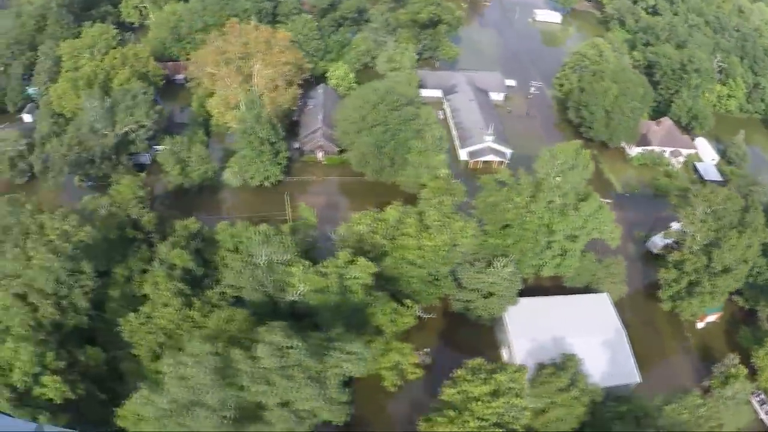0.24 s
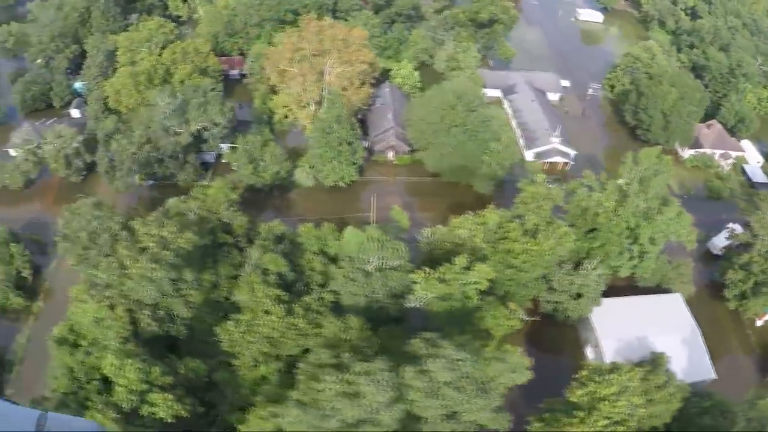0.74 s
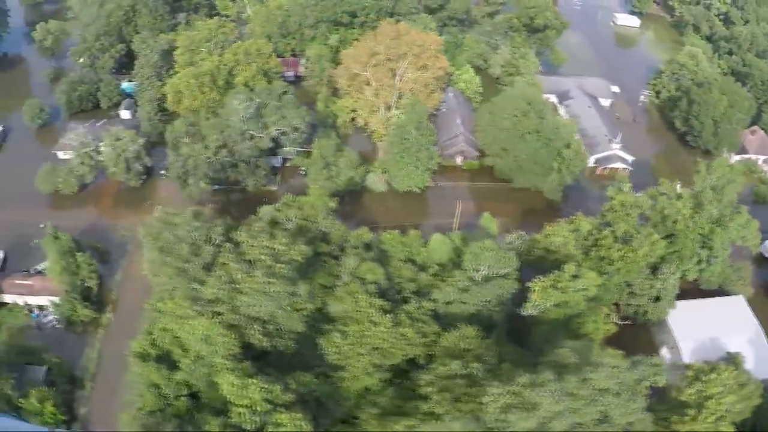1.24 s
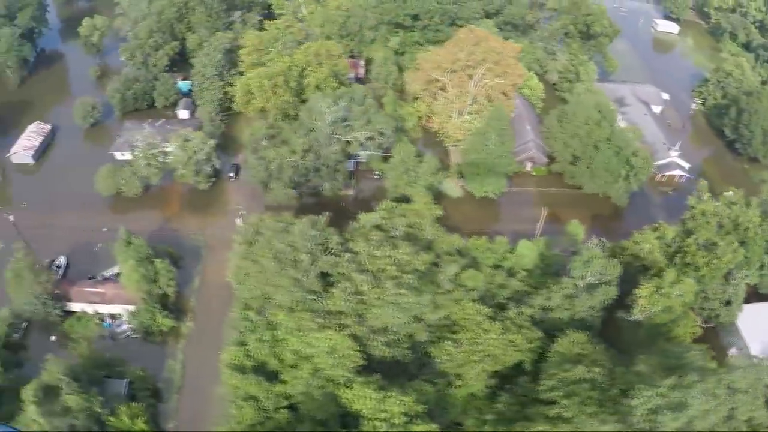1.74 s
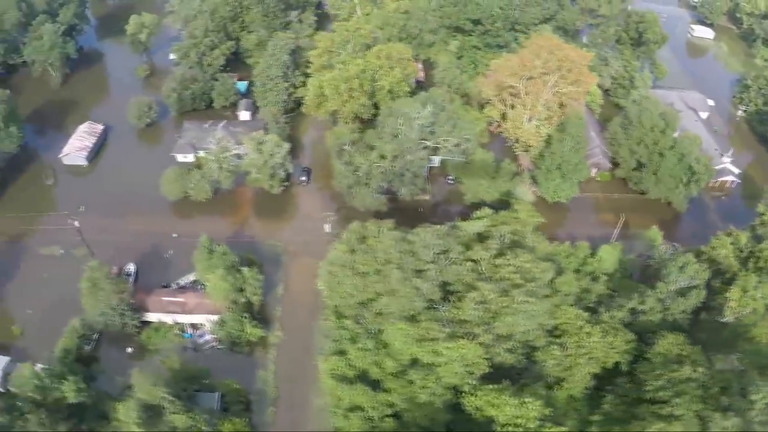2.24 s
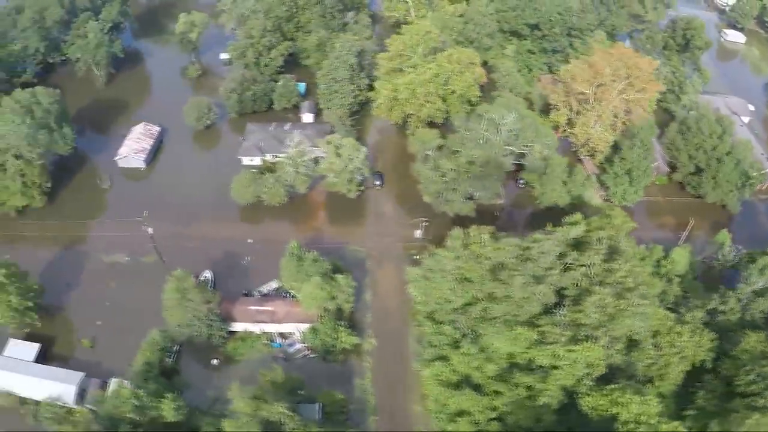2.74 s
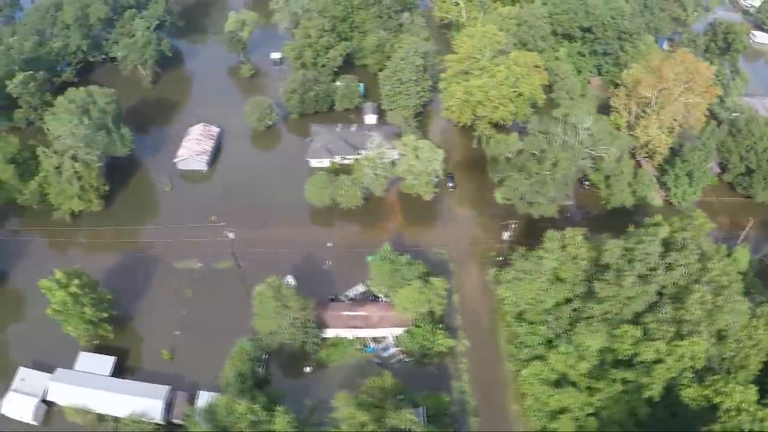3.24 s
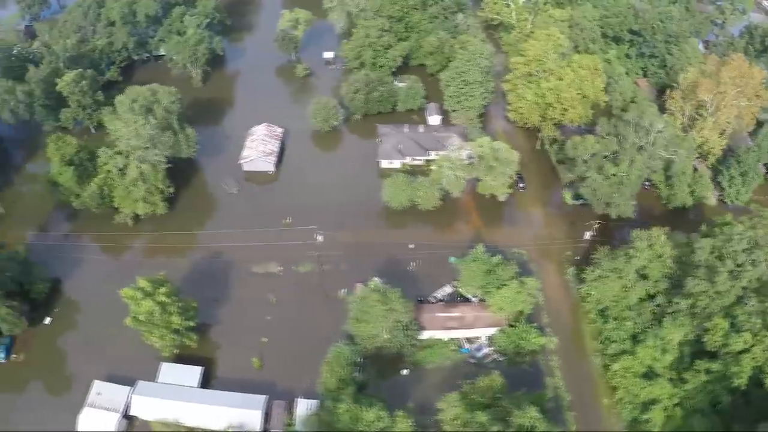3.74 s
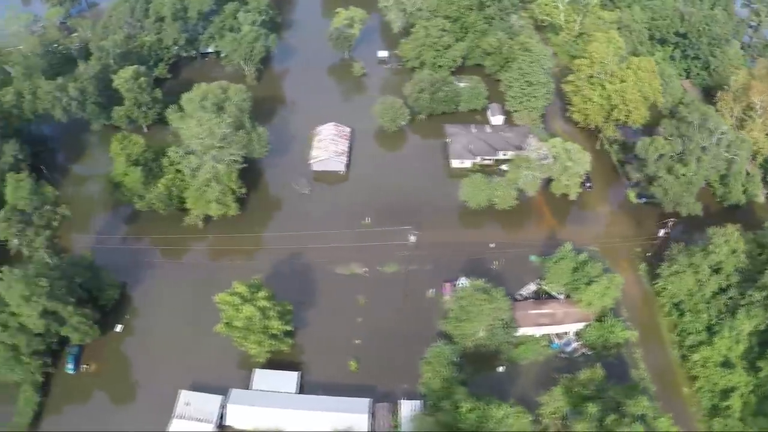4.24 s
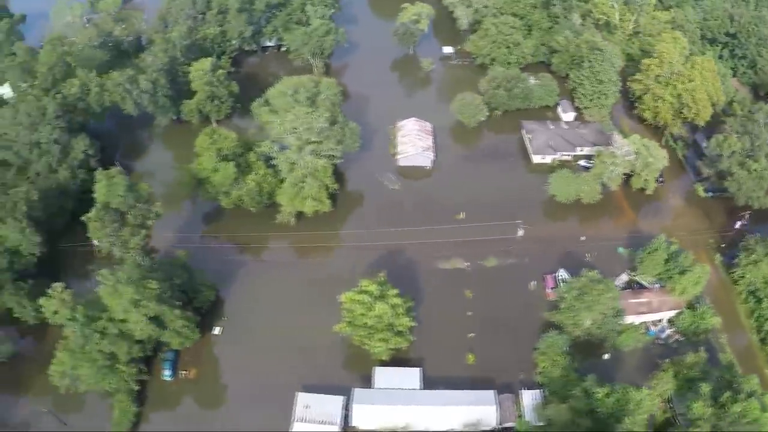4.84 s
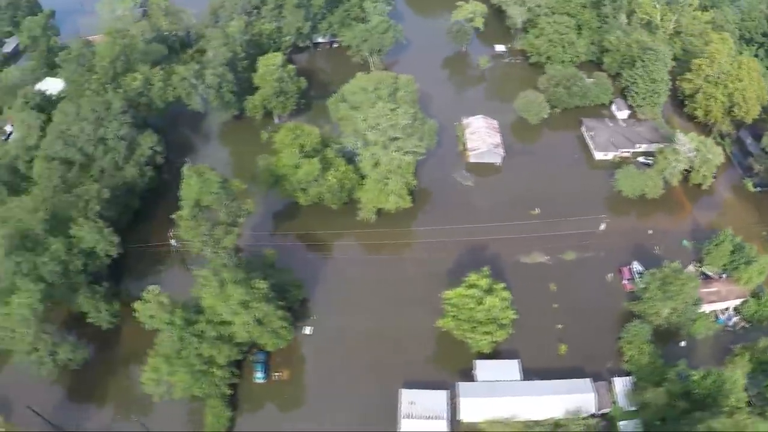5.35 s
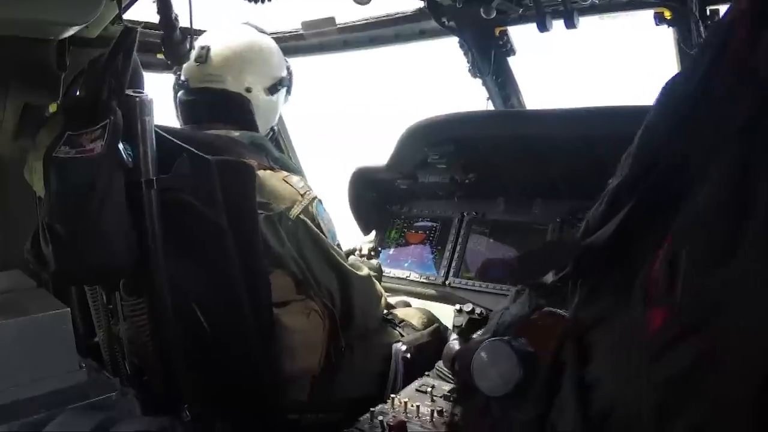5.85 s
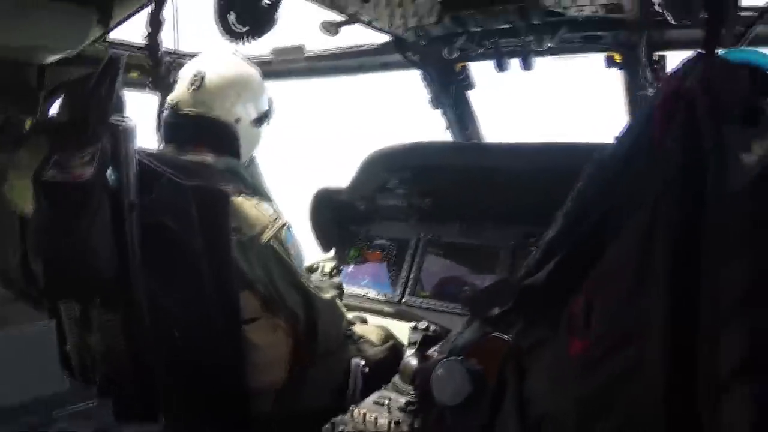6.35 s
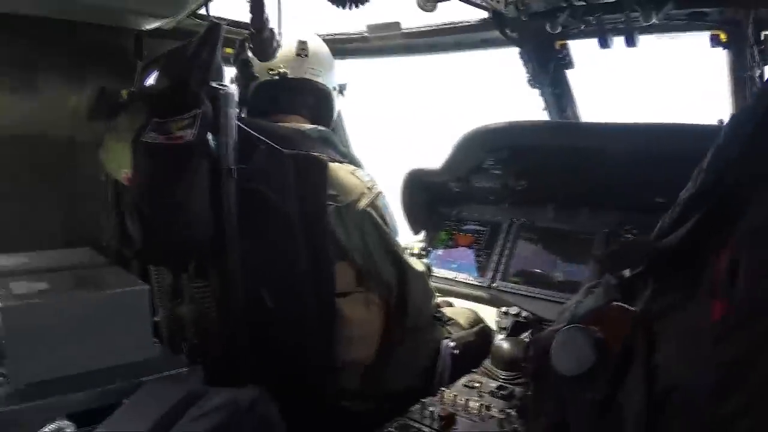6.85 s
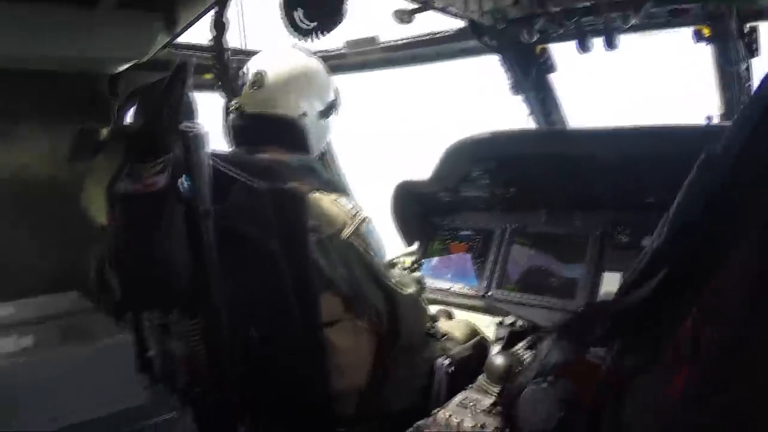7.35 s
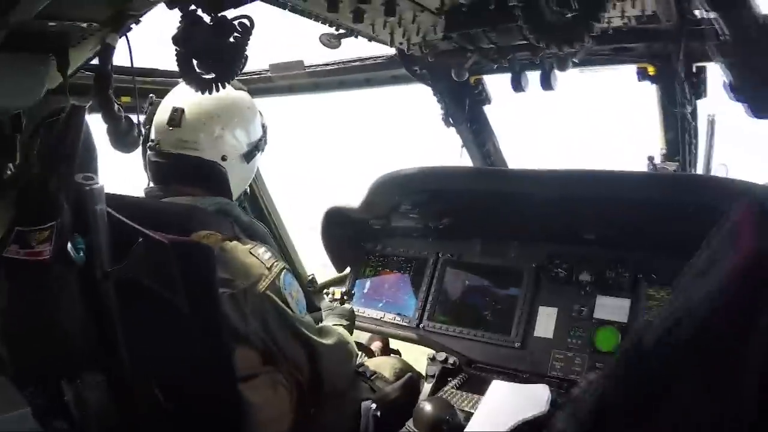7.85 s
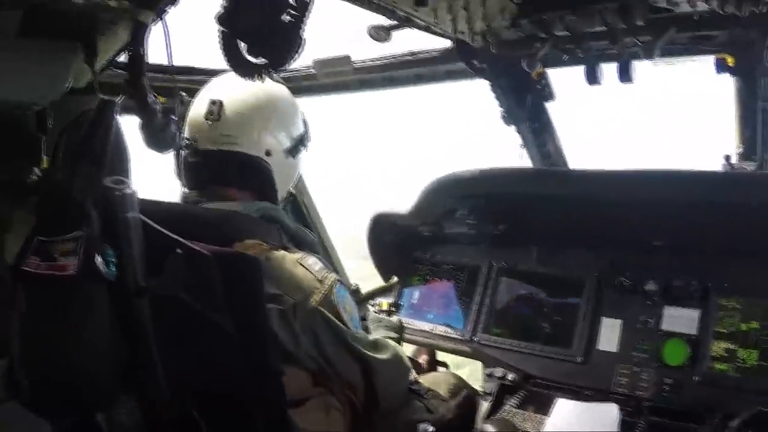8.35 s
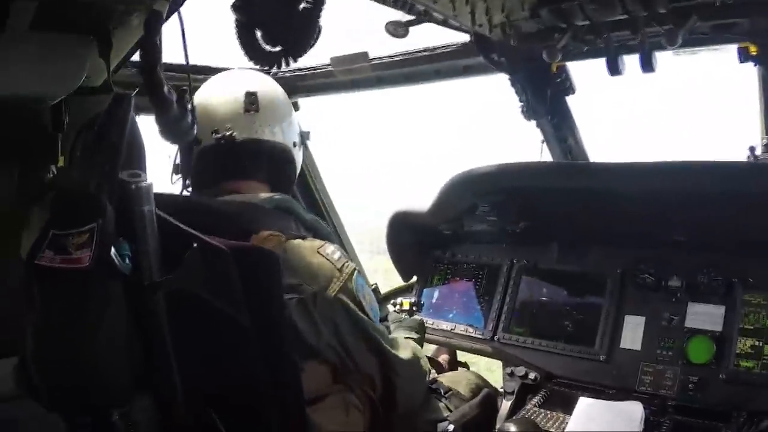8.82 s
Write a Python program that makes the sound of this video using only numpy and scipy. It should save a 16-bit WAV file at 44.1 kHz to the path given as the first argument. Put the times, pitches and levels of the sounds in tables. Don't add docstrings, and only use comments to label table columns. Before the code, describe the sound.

Close, rough camera microphone aboard a helicopter. First, bright broadband wind and exhaust roar pulses with very fast rotor beats, one blade tip whistling strongest, while wakes smack the hull and the tail rotor drones. Then a hard cut: rattling gusty air fades in small ticking steps within half a second, leaving heavy low throbbing, dull cabin roar, wavering gear hum, occasional panel taps and faint, very high compressor whine.

```python
import sys
import numpy as np
from scipy import signal
from scipy.fft import rfft, irfft, next_fast_len
from scipy.io import wavfile
from scipy.ndimage import uniform_filter1d

SR = 44100
rng = np.random.default_rng(int(sys.argv[2]) if len(sys.argv) > 2 else 0)


def volts_from_db(level):
    exponent = np.asarray(level, float) / 20
    return 10 ** exponent


def dump(signal):
    limited = np.clip(np.atleast_2d(signal).T, -1, 1)
    pcm = np.round(limited * 32767).astype(np.int16)
    wavfile.write(sys.argv[1], SR, pcm)


N = 400428
CUT_S, BACK_S = 5.5258, 5.5588


def read(table, s):
    at, *columns = np.transpose(table)
    return [np.interp(s, at, column) for column in columns]


def on_log(table, hz):
    rows = [(np.log(f), *values) for f, *values in table]
    return read(rows, np.log(np.maximum(hz, 1)))


def walk(size, rate):
    period = max(int(SR / rate), 2)
    hop = period // 24 + 1
    v = rng.standard_normal(size // hop + 2)
    for _ in range(3):
        v = uniform_filter1d(v, max(period // hop * 4 // 5, 2))
    return np.interp(np.arange(size) / hop, np.arange(len(v)), v / v.std())


def tone(hz, width, steady):
    waver = (walk(len(hz), width) + 1j * walk(len(hz), width)) / np.sqrt(2)
    share = np.clip(steady, 0, 1)
    turning = np.exp(2j * np.pi * np.cumsum(hz) / SR)
    return np.sqrt(2) * turning * (np.sqrt(share) + np.sqrt(1 - share) * waver)


def drift(s, db_per_s):
    return db_per_s * (s - s.mean())


def rotor(s, rate, turn, cruise_hz, slack):
    hz = read(rate, s)[0]
    return turn + np.cumsum(hz) / SR, (hz / cruise_hz) ** slack


# time_s, passes_hz
DOOR_PASSES = [(0.0, 17.092), (1.11, 17.154), (2.21, 17.25), (3.32, 17.313), (4.42, 17.272), (5.53, 17.061)]


def door_rotor(s):
    return rotor(s, DOOR_PASSES, turn=.231, cruise_hz=17.22, slack=.3)


# time_s, passes_hz
COCKPIT_PASSES = [(5.56, 17.266), (6.26, 17.16), (6.97, 17.102), (7.67, 17.105), (8.38, 17.182),
                  (9.08, 17.347)]


def cockpit_rotor(s):
    return rotor(s, COCKPIT_PASSES, turn=.745, cruise_hz=17.12, slack=.6)


def thump(turn, orders, lag, wobble_db):
    total = 0
    for k, db in orders:
        level_db = db + wobble_db * min(k - .75, 2.5) * walk(len(turn), 5)
        wave = np.cos(2 * np.pi * (k * turn + lag * (k - 1)))
        total = total + volts_from_db(level_db) * np.sqrt(2) * wave
    return total


# multiple, level_db
DOOR_THUMP = [(1, -15.5), (2, -27), (3, -26), (4, -23.5), (5, -41.5), (6, -36), (7, -30)]


def door_thump(turn):
    return thump(turn, DOOR_THUMP, lag=.15, wobble_db=1.2)


# multiple, level_db
COCKPIT_THUMP = [(1, -7), (2, -35.5), (4, -28), (5, -36), (6, -40), (7, -36.5), (8, -41.5), (9, -38.5),
                 (10, -40.5), (11, -40.5), (12, -37.5), (13, -42.5)]


def cockpit_throb(turn):
    return np.tanh(1.4 * thump(turn, COCKPIT_THUMP, lag=.09, wobble_db=1.1)) / 1.4


TIP_LEVELS = [-36.5, -29, -38.5, -37.5]
# time_s, extra_db
TIP_TURNS = [(.05, 1.5), (.28, 1.5), (.52, 4.5), (.75, 4), (.98, 0), (1.22, 3.5), (1.45, 1), (1.68, 1.5),
             (1.91, 1.5), (2.15, 1), (2.38, 3), (2.61, -1), (2.85, -1), (3.07, -4), (3.3, -1), (3.54, -5),
             (3.77, -3), (4.0, -2), (4.23, -1), (4.46, -1), (4.69, -2), (4.92, -6), (5.16, -7), (5.4, 1)]


def tips(s, turn, lean_db):
    late = turn + .43
    past = late % 1 - .5
    level_db = np.array(TIP_LEVELS)[np.floor(late).astype(int) % 4] + .8 * walk(len(turn), 60)
    pitch_hz = 6100 - 1900 * past + 150 * walk(len(turn), 25)
    whistle = volts_from_db(level_db) * np.exp(-(past / .3) ** 2) * tone(pitch_hz, 1200, .2).real
    return whistle * volts_from_db(lean_db + drift(s, -.7) + read(TIP_TURNS, s)[0])


def spectrum_hz(s):
    return np.fft.rfftfreq(2 * next_fast_len(len(s) // 2 + 1), 1 / SR)


def colour(table, db, hz):
    gain = volts_from_db(on_log(table, hz)[0])
    return gain * volts_from_db(db) / np.sqrt(np.mean(gain ** 2))


AIR_ZONES = [200, 600, 3000, 10000]


def rush(s, turn, gain, zones, swish, blades, gust_db, flicker_db):
    size = 2 * (len(gain) - 1)
    octave = np.log2(np.maximum(np.fft.rfftfreq(size, 1 / SR), 1))
    noise = rfft(rng.standard_normal(size)) * gain
    gust = walk(len(s), 21)
    out = 0
    for at in np.arange(3, 14.5, .5):
        window = np.cos(np.pi * np.clip(octave - at, -.5, .5)) ** 2
        band = irfft(noise * window)[:len(s)]
        place = np.interp(at, np.log2(AIR_ZONES), np.arange(4))
        zone_db = np.maximum(1 - abs(np.arange(4) - place), 0) @ zones * np.clip(at - 6, 0, 1)
        moment, depth_db = on_log(swish, 2 ** at)
        nearest = np.floor(turn - moment + .5).astype(int) % 4
        blade_db = np.array(blades)[nearest] * np.clip(at - 11, 0, 1)
        swell = np.cos(np.pi * (turn - moment)) ** 2
        swell_db = depth_db * (2 * swell - 1) + 2 * blade_db * swell
        out = out + band * volts_from_db(zone_db + swell_db + gust_db * gust + flicker_db * walk(len(s), 21))
    return out


# time_s, extra_db
LEAN = [
    (0.0, 2.5),
    (1.05, 2),
    (2.8, 2),
    (3.85, 2),
    (4.25, 4),
    (4.6, 1.5),
    (4.9, -2.5),
    (5.25, -1),
    (5.52, 0),
]
LEAN_SHARE = [0.56, 0.54, 0.36, 0.92]
DOOR_DRIFT = [-0.41, -0.082, 0.85, -0.41]


def door_lean(s):
    return np.outer(LEAN_SHARE, read(LEAN, s)[0]) + np.outer(DOOR_DRIFT, s - s.mean())


# pitch_hz, level_db (per Hz)
DOOR_LOW = [(6, -5.5), (25, -0.5), (60, -2.5), (100, -3), (160, -8), (230, -12), (290, -17.5), (410, -18),
            (500, -30), (650, -77)]
DOOR_HIGH = [(290, -8.5), (500, 2), (542, -12), (725, 0.5), (863, 0), (1130, -12), (1270, -6), (1510, -2.5),
             (2300, -7), (2660, -4.5), (3300, -8), (4700, -11.5), (6750, -7), (7700, -20), (10400, -40.5),
             (14500, -100)]
DOOR_TOP = [(8000, -10), (9500, 0), (10500, 0), (12000, -1), (13000, -7), (13400, -9), (13800, -12),
            (15200, -16)]
# pitch_hz, width_hz, change_db
DOOR_DIPS = [(533, 67, -3), (1115, 58, -8)]
# pitch_hz, moment_turns, depth_db
DOOR_SWISH = [(60, 0.015, -2.5), (250, -0.24, 0.9), (700, 0.15, 1.5), (1810, 0.05, 2), (3270, 0.2, 0),
              (6740, 0.087, 2), (10000, 0.011, 1.4)]
DOOR_BLADES = [-0.016, -0.14, -0.55, -0.55]


def door_air(s, turn, zones):
    hz = spectrum_hz(s)
    dips_db = sum(db * np.exp(-((hz - f) / width) ** 2) for f, width, db in DOOR_DIPS)
    gain = np.hypot(colour(DOOR_LOW, -15, hz), colour(DOOR_HIGH, -25, hz)) * volts_from_db(dips_db)
    gain = np.hypot(gain, colour(DOOR_TOP, -60.5, hz))
    return rush(s, turn, gain, zones, DOOR_SWISH, DOOR_BLADES, gust_db=.5, flicker_db=.5)


OPEN_LEVELS = [8.2, 13.2, 16.7, .1]
GUST_SHARE = [0.71, 1, .01, .01]
COCKPIT_DRIFT = [-0.87, -1.1, 0.4, -0.98]


def closing_filter(s):
    shut = np.clip(1 - (s - BACK_S) / .55, 0, 1) ** .84
    early = np.clip(1 - (s - BACK_S) / .095, 0, 1)
    zones = zip(OPEN_LEVELS, GUST_SHARE, COCKPIT_DRIFT)
    return np.array([db * shut * (1 - share * early) + drift(s, sag) for db, share, sag in zones])


# pitch_hz, level_db (per Hz)
COCKPIT_LOW = [(6, -14), (25, -15), (50, 0.5), (100, -3.5), (200, -4.5), (260, -16.5), (335, -21.5),
               (420, -32), (550, -46), (900, -100)]
COCKPIT_HIGH = [(250, -43), (420, -3.5), (480, 0), (620, -0.5), (860, -6.5), (1320, -9.5), (1800, -15.5),
                (2170, -18.5), (2600, -23.5), (4440, -28.5), (6670, -24.5), (8030, -35), (9600, -44.5),
                (11500, -69)]
# pitch_hz, moment_turns, depth_db
COCKPIT_SWISH = [(60, 0.41, 0.76), (250, 0.034, 2.3), (700, 0.05, 0.89), (1800, 0.27, 1.3),
                 (3200, 0.41, 0.86), (5000, 0.39, 3.3), (9000, 0.19, 4.8)]
COCKPIT_BLADES = [-0.36, 0.63, -0.0044, -0.34]


def cockpit_air(s, turn):
    hz = spectrum_hz(s)
    gain = np.hypot(colour(COCKPIT_LOW, -24.5, hz), colour(COCKPIT_HIGH, -31, hz))
    return rush(s, turn, gain, closing_filter(s), COCKPIT_SWISH, COCKPIT_BLADES, gust_db=.12, flicker_db=.73)


def slaps(s, rows):
    total = 0
    for start_s, db, hz, ring_s in rows:
        age = np.clip((s - start_s) / ring_s, 0, 30)
        ring = np.sin(2 * np.pi * hz * ring_s * age)
        total = total + volts_from_db(db) * ring * 1.07 * age * np.exp(1 - age)
    return total


# start_s, level_db (peak), pitch_hz
HULL_SLAPS = [(0.033, -14, 369), (0.084, -22, 320), (0.236, -18, 322), (0.33, -14, 395), (0.389, -16, 377),
              (0.443, -12, 388), (0.619, -13, 388), (0.74, -22, 398), (0.792, -22, 420), (0.913, -15, 400),
              (0.969, -12, 315), (1.115, -16, 331), (1.173, -18, 320), (1.323, -11.5, 404),
              (1.419, -16, 377), (1.971, -25, 323), (2.02, -27, 353), (2.082, -23, 345), (2.185, -14, 320),
              (2.298, -18, 355), (2.459, -17, 383), (2.542, -11, 362), (2.599, -16, 423), (2.65, -26, 363),
              (2.719, -16, 320), (2.838, -19, 478), (3.179, -14, 387), (3.467, -20, 415), (3.628, -21, 358),
              (3.7, -22, 470), (3.875, -24, 339), (4.273, -26, 440), (4.339, -16, 354), (4.389, -17, 433),
              (4.45, -10.5, 386), (4.564, -16, 394), (4.621, -13, 424), (4.678, -18, 479),
              (4.738, -14.5, 408), (4.855, -17, 344), (4.909, -16, 353), (5.032, -20, 408),
              (5.211, -20, 363), (5.263, -30, 440)]


def hull_slaps(s):
    return slaps(s, [(t, db - 3.5, hz, .0045) for t, db, hz in HULL_SLAPS])


# start_s, level_db (peak), pitch_hz, ring_s
PANEL_SLAPS = [
    (6.147, -23, 545, 0.0043),
    (6.556, -25, 597, 0.005),
    (6.731, -33, 540, 0.0034),
    (6.845, -20, 577, 0.004),
    (6.904, -19.5, 596, 0.0035),
    (7.082, -22, 606, 0.0024),
    (7.1385, -17, 565, 0.0021),
    (7.721, -34, 474, .003),
    (8.019, -37, 579, .003),
    (8.61, -28, 676, .003),
]
# start_s, level_db (peak), pitch_hz
GUST_SLAPS = [
    (5.604, -15, 986),
    (5.628, -10, 990),
    (5.663, -7.5, 654),
    (5.746, -9, 662),
    (5.797, -14, 980),
    (5.971, -14, 536),
    (6.025, -22, 977),
]


def panel_slaps(s):
    gust = [(t, db - 5, hz, .0038) for t, db, hz in GUST_SLAPS]
    return slaps(s, PANEL_SLAPS + gust)


def gears(speed, lines, steady, groups_db):
    total = 0
    for hz, db, width, group in lines:
        total = total + volts_from_db(db + groups_db[group]) * tone(hz * speed, width, steady[group]).real
    return total


# pitch_hz, level_db, width_hz, group
DOOR_GEARS = [
    (79.6, -20, 5, 0),
    (159.4, -30, 3, 0),
    (239, -39, 3, 0),
    (994, -53, 6, 0),
    (1965, -45, 70, 0),
    (2022, -44.5, 20, 1),
    (2035, -49, 14, 1),
    (2705, -46, 70, 0),
    (2958, -49, 40, 0),
    (10960, -81, 10, 0),
]
# time_s, extra_db
DOOR_MESH = [(0, 1), (1.2, 5), (2.5, 0.5), (3.8, -1), (4.3, 3), (4.62, 6), (4.8, -2), (5.5, -1)]


def door_gears(s, speed):
    tail = gears(speed, DOOR_GEARS[:3], [.82], [0])
    return tail + gears(speed, DOOR_GEARS[3:], [.45, .75], [0, read(DOOR_MESH, s)[0]])


# pitch_hz, level_db, width_hz, group
COCKPIT_GEARS = [(78.9, -39, 3, 0), (651, -47, 10, 2), (966, -44.5, 9, 1), (985.5, -39.5, 35, 1),
                 (1168, -52, 8, 2), (1304, -48.5, 10, 2), (1395, -55, 30, 3), (1950, -51, 50, 4),
                 (1972, -54, 50, 4), (2004, -47, 60, 3), (2935, -61, 40, 4), (2955, -60, 40, 4),
                 (3010, -65, 25, 4), (3940, -64, 20, 4), (4012, -67, 20, 4), (4892, -66.5, 20, 4),
                 (7640, -70, 20, 5)]
MESH_STEADY = [.8, .9, .8, .85, .6, .8]
# time_s, main_db, small_db, second_db, third_db
MESH_SPOTS = [(5.56, 7, 8, 22, 18), (5.66, 7.5, -3, 14, 11), (5.82, 9.5, 2, 10, 7), (5.95, 4.5, -4, 4, 0),
              (6.15, 2, 0, 2.5, 2.5), (6.6, -2, 2, -1, -1), (6.85, 1, -1, 3, 0), (7.05, 1.5, 1, 0, -1),
              (7.25, 5, 0, 2, 3), (7.5, 5, 2, 2, 3), (7.74, 3, -2, -11, 1), (7.95, -2, -5, -7, -3),
              (8.1, 1.5, 3, -7, 0), (8.27, -2.5, 4, 3, 1.5), (8.6, -2, 0, -5, 1.5), (9.08, 1, 5.5, 0, 1)]


def cockpit_gears(s, turn, speed):
    main, small, second, third = read(MESH_SPOTS, s)
    flutter = 3 * np.cos(2 * np.pi * (turn - .3))
    groups_db = [0, main + flutter, small, second + flutter, third + flutter, drift(s, 2.5)]
    wobble = 1 + .0025 * walk(len(s), 9)
    return gears(speed * wobble, COCKPIT_GEARS, MESH_STEADY, groups_db)


def whine(hz, db, width, skirt_db, steady):
    return volts_from_db(db) * (tone(hz, width, steady) + volts_from_db(skirt_db) * tone(hz, 2200, 0)).real


# time_s, pitch_hz, level_db
DOOR_WHINE = [(0.0, 13150, -77), (0.3, 13039, -76), (0.9, 13110, -74), (1.2, 13155, -81), (1.6, 13225, -74),
              (1.9, 13220, -79), (2.1, 13168, -73), (2.5, 13090, -83), (3.3, 13050, -77), (4.3, 13030, -72),
              (4.8, 13010, -82), (5.4, 13069, -77)]


def door_whine(s):
    return whine(*read(DOOR_WHINE, s), 12, skirt_db=-45, steady=.7)


def heard(s, full_s, rise_db, level_db):
    return level_db - rise_db * np.maximum(full_s - s, 0)


# time_s, pitch_hz
SPOOL = [(6.4, 12916), (6.84, 12930), (7.72, 13083), (8.16, 13095), (8.82, 13071), (9.04, 13086)]


def cockpit_whines(s):
    left_hz = read(SPOOL, s)[0]
    glimpse_db = -60 - 700 * (s - BACK_S)
    left_db = np.maximum(heard(s, 6.98, 39, -55.5), glimpse_db)
    left = whine(left_hz, left_db, 70, skirt_db=-1.5, steady=.2)
    right = whine(left_hz * 1.0581, heard(s, 6.9, 55, -58), 90, skirt_db=-5, steady=.15)
    return left + right


def ragged(x):
    edge_hz, swing_hz = 13150, 480
    hz, at, z = signal.stft(x, SR, nperseg=1024, boundary="even")
    lift = np.minimum(.6 * walk(len(x), 3) + walk(len(x), 22) + 1.7, 3.8)
    lift = lift[np.minimum(at * SR, len(x) - 1).astype(int)]
    scattered = (hz[:, None] < edge_hz + swing_hz * lift) & (rng.random(z.shape) < .45)
    kept = scattered | (hz[:, None] < edge_hz)
    return signal.istft(z * kept, SR, nperseg=1024)[1][:len(x)]


def door(s):
    turn, speed = door_rotor(s)
    zones = door_lean(s)
    blades = door_thump(turn) + tips(s, turn, zones[2])
    air = door_air(s, turn, zones) + hull_slaps(s)
    return ragged(blades + air + door_gears(s, speed) + door_whine(s))


def cockpit(s):
    turn, speed = cockpit_rotor(s)
    air = cockpit_air(s, turn) + panel_slaps(s)
    return cockpit_throb(turn) + air + cockpit_gears(s, turn, speed) + cockpit_whines(s)


def scene():
    s, out = np.arange(N) / SR, np.zeros((1, N))
    out[0, s < CUT_S] = door(s[s < CUT_S])
    out[0, s >= BACK_S] = cockpit(s[s >= BACK_S])
    edges = np.clip(np.maximum((CUT_S - s) / .00002, (s - BACK_S) / .005), 0, 1)
    return (out - .0096) * edges


def top_cut(x):
    return signal.sosfilt(signal.butter(12, 15600, fs=SR, output="sos"), x)


def record(dry):
    block_s = 256 / 48000
    blocks = (np.arange(N) / SR - 5.73388) / block_s
    uneven = volts_from_db(3.2 * rng.standard_normal(N // 200))[np.clip(blocks, 0, None).astype(int)]
    fade = np.exp(-np.maximum(blocks, 0) * block_s / .18)
    jerk = (blocks > 0) * .28 * fade * uneven * (.5 - blocks % 1)
    x = dry * (1 + jerk)
    excess = x - x / (1 + (x / .8) ** 6) ** (1 / 6)
    mix = x - uniform_filter1d(uniform_filter1d(excess, size=15), size=11)
    return top_cut(mix)


dry = scene()
out = record(dry)
dump(out)
```